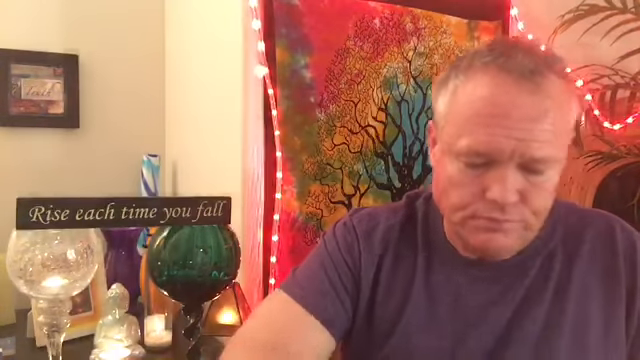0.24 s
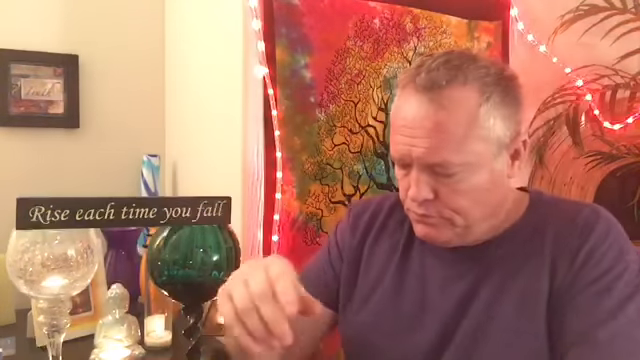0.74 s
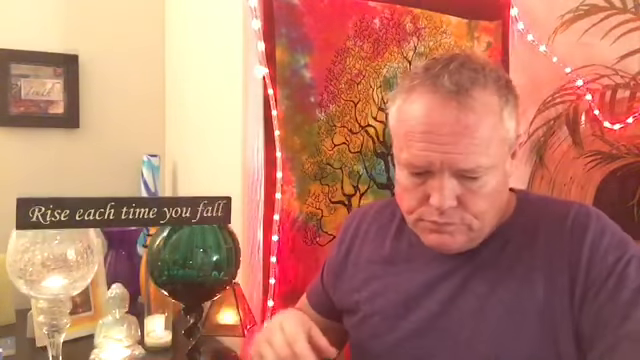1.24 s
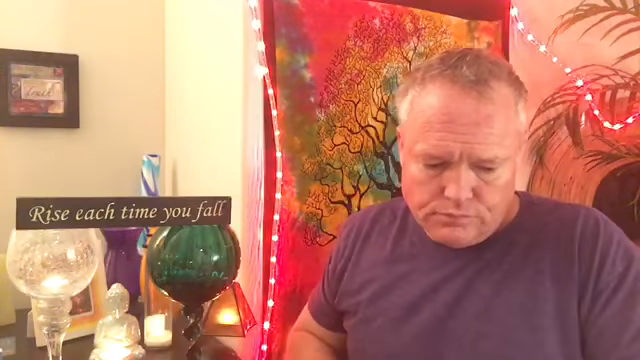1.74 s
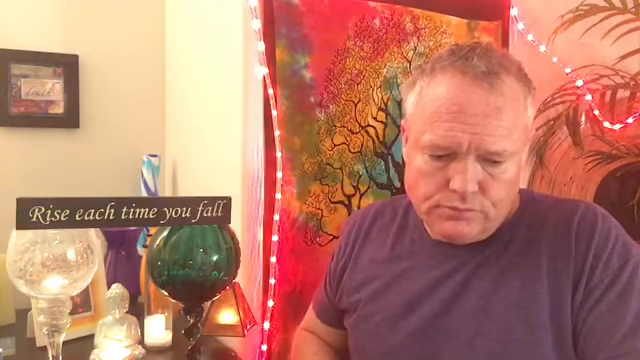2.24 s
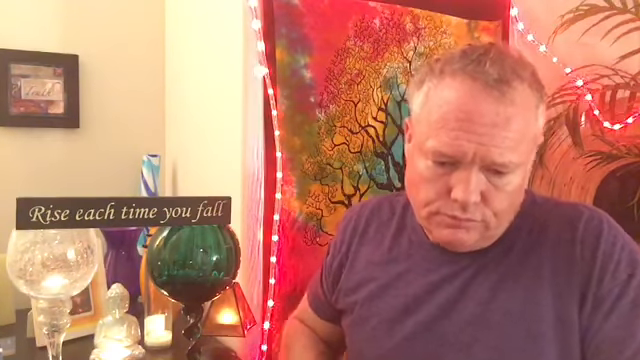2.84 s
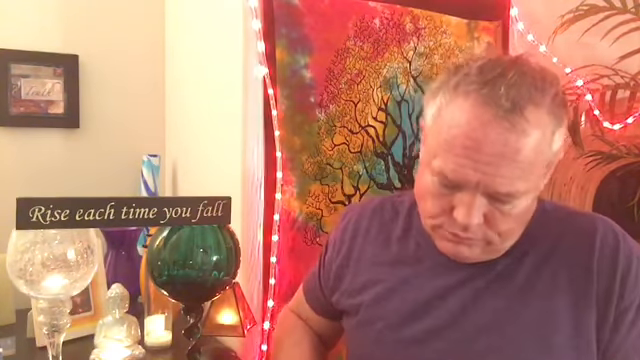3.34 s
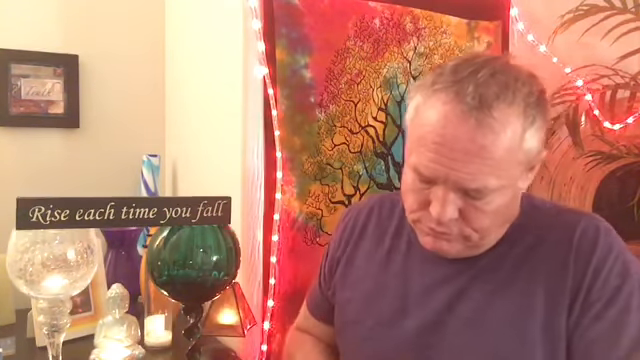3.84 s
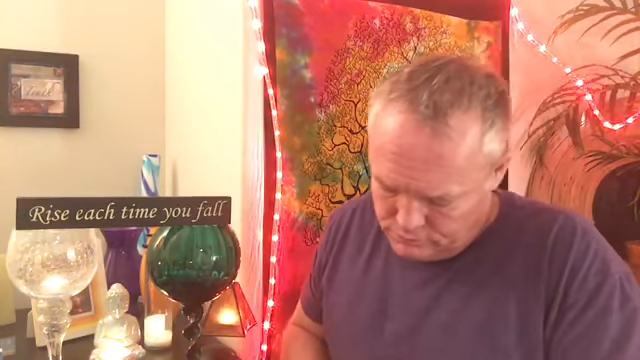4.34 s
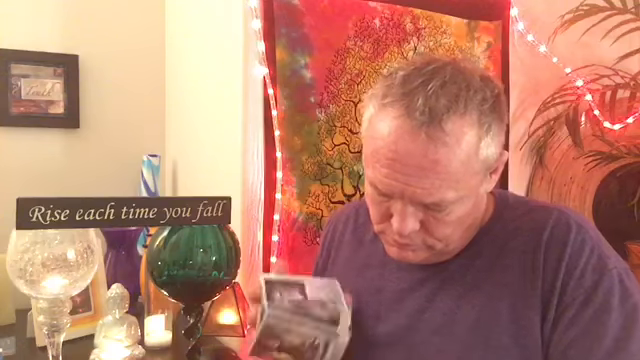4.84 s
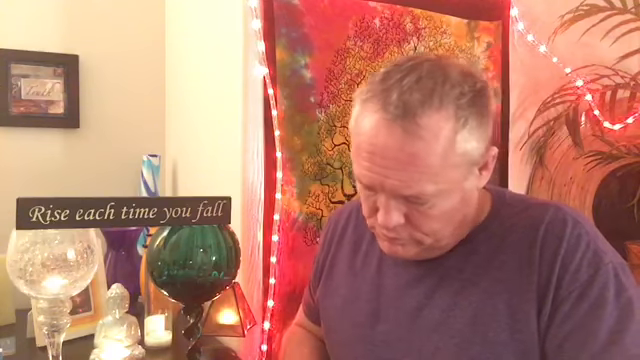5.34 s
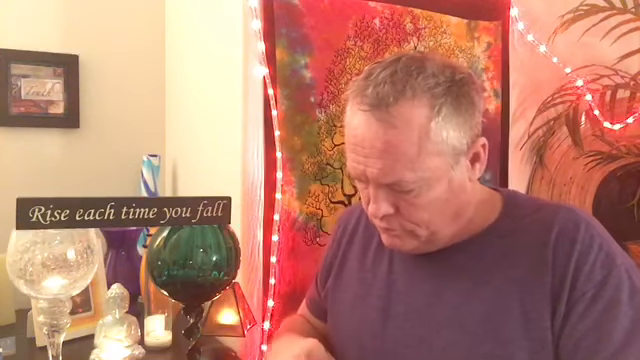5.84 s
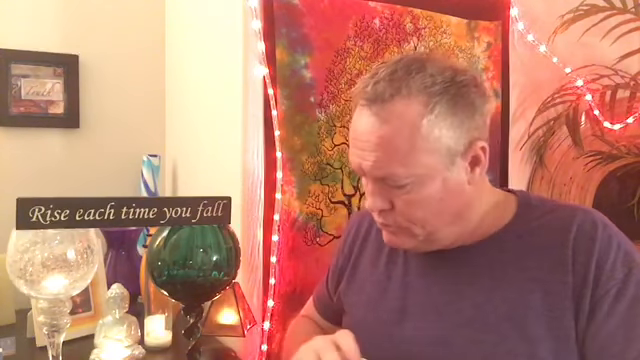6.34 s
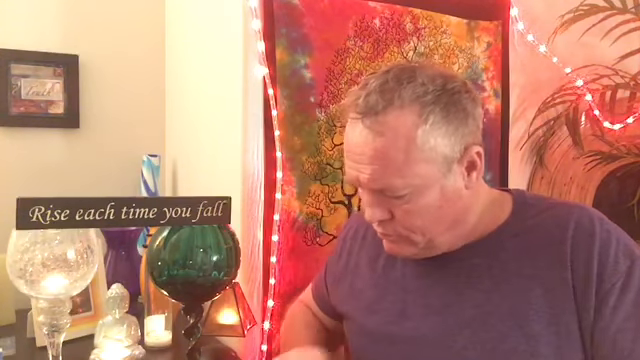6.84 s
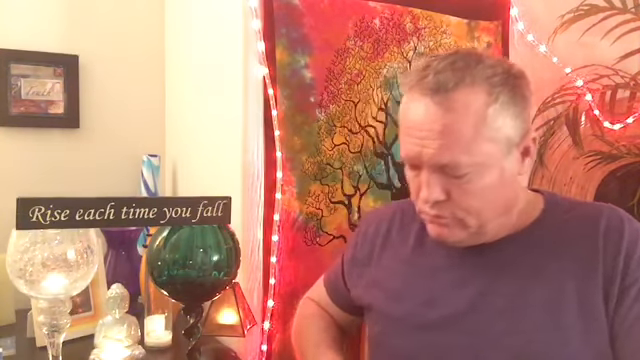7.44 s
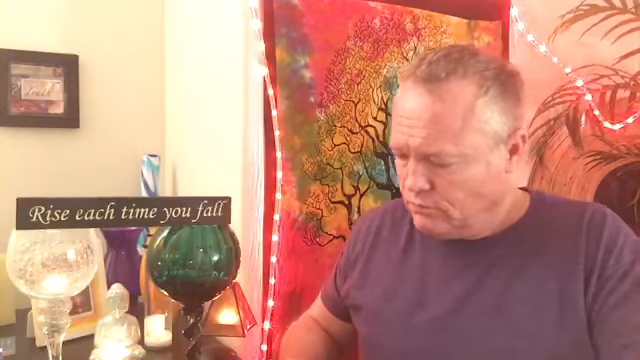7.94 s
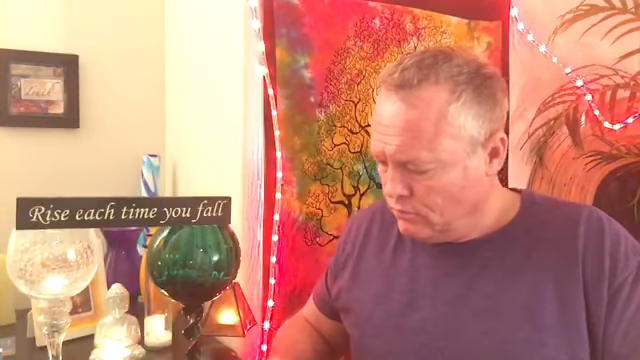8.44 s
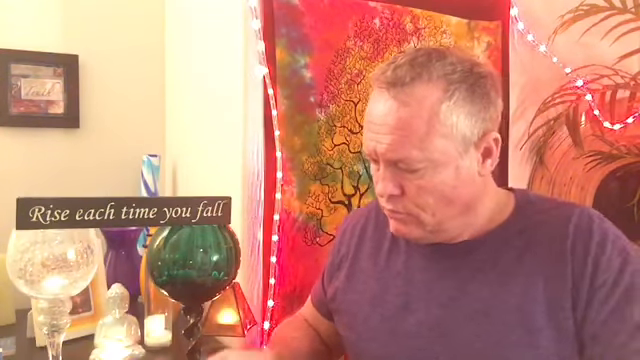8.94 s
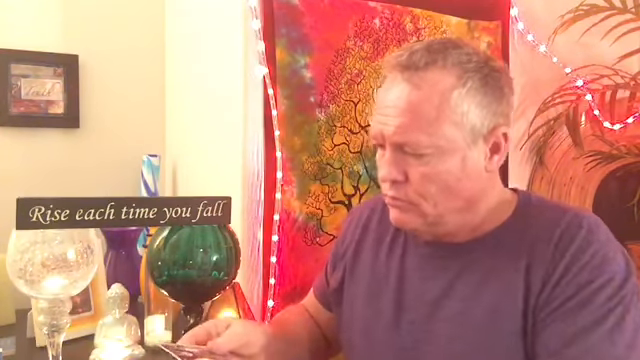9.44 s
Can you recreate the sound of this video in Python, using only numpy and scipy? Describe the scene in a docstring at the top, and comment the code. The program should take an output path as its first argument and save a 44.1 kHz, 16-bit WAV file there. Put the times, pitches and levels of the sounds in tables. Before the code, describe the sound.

Cards are handled close by on a table in a small, quiet room. Soft sliding and a few dull hand bumps open, with a light tap of the deck at about 1.6 seconds and small snaps around 2. At 3 seconds the deck hits the table with the loudest sound, a sharp snap and thud, followed by a second knock at 3.4 and soft rustling. At 5 seconds a quick run of cards flicks off the thumb and ends in a slap. Gentle sliding continues until just after 6, then there is a lull. Another knock comes at about 7.5 seconds, with light snaps and bumps until 8.3 and a faint slide near 9. Underneath are steady room noise with a low hum, a thin whine, faint regular ticks and occasional tiny pips.

```python
"""Tarot cards on a cloth-covered table

In a small, quiet room a deck is knocked on the table, a run of cards flicks off the thumb, and cards
are slid and laid down. Impact snaps their edges, expels trapped air in a clap and excites the modes
of the table; friction gives a hiss. A few faint pips are heard. Under it lie a steady room noise,
a thin whine and faint regular ticks."""
import sys
import numpy as np
from scipy import signal
from scipy.fft import rfft, irfft
from scipy.io import wavfile
from scipy.ndimage import uniform_filter1d, minimum_filter1d

SR = 44100
rng = np.random.default_rng(int(sys.argv[2]) if len(sys.argv) > 2 else 0)


def output_pcm(signal):
    """Save a mono or channel-first signal as 16-bit PCM at the path in sys.argv[1].

    Samples are clipped to [-1, 1] before scaling.
    """
    pcm = np.clip(np.atleast_2d(signal).T, -1, 1) * 32767
    wavfile.write(sys.argv[1], SR, np.round(pcm).astype(np.int16))


N = 427302

# The deck or a packet lands: (time [s], snap [dB], air clap [dB], edge [dB], decay time [s],
# face slap [dB], thud [dB], thud frequency [Hz], ring relative to thud [dB], rebound [dB])
DECK_KNOCKS = [(1.648, -34.5, -32.5, -75, 0.0079, -35, -21.5, 266, -12, -25),
               (2.9699, -7, -24.5, -42, .016, -13, -7, 210, -3, -10),
               (3.4015, -12, -19, -57, 0.0061, -19.5, -14, 310, -0.5, -14.5),
               (3.694, -37, -44, -72, 0.004, -42, -23, 395, -5, -35),
               (5.0875, -15, -15, -43, .002, -21, -13.5, 222, 0.5, -18.5),
               (7.5527, -18, -18, -45, 0.0054, -24.5, -17, 350, -14, -31)]
# Single cards snap: (time [s], snap [dB], air clap [dB], edge [dB], decay time [s])
CARD_SNAPS = [(0.419, -34, -52, -75, 0.0011), (1.980, -39, -44, -72, 0.0039),
              (2.082, -36, -60, -70, 0.0038), (2.3615, -40, -32, -75, 0.0028),
              (3.385, -46, -33, -69, 0.0068), (5.0053, -14, -17.5, -41, 0.0029),
              (5.027, -17.5, -16, -45, 0.0054), (5.0448, -19.5, -13.5, -43, 0.0048),
              (5.0812, -36, -42, -41, .001), (5.1244, -19.5, -23, -53, 0.0047),
              (5.622, -36.5, -54, -78, 0.003), (7.481, -41, -35.5, -70, 0.0023),
              (7.534, -33.5, -43, -47, .014), (7.8925, -25, -39, -80, 0.0033),
              (7.919, -31, -38, -69, 0.0033), (8.128, -40.5, -45, -60, 0.0067),
              (8.243, -38.5, -43, -57, 0.01)]
# Spectra of the three parts of a card impact: (frequency [Hz], relative level [dB])
SNAP_SPECTRUM = [(40, -56), (300, 2.5), (1000, -15.5), (1600, -7), (2100, 0), (2600, 2.5), (3150, 2),
                 (3550, -4), (4100, -10.5), (5000, -21.5), (6000, -24), (7000, -38), (9000, -60),
                 (11000, -79)]
CLAP_SPECTRUM = [(35, -53), (120, -20), (350, -15.5), (500, -10), (650, -1), (780, 1), (950, -4),
                 (1150, -0.5), (1450, -8), (1900, -11.5), (3000, -4.5), (6000, -70)]
EDGE_SPECTRUM = [(100, -51), (1500, -7), (4000, 3), (6200, 5.5), (7300, -3.5), (8800, 4), (10400, -17),
                 (11500, -8), (15500, -23)]
# A hand bumps the table: (time [s], level [dB], push frequency [Hz])
HAND_BUMPS = [(0.993, -30.5, 190), (1.026, -28, 242), (1.1, -23, 265), (1.257, -40, 170), (1.399, -38, 166),
              (2.706, -38, 169), (2.810, -39, 160), (3.173, -30, 212), (3.386, -20, 259), (4.972, -29, 270),
              (5.012, -22.5, 258), (5.221, -23, 224), (7.379, -33, 174), (7.494, -27.5, 213),
              (7.901, -27.5, 227), (8.088, -27.5, 228), (8.151, -25, 178)]
# Normal modes of the table: (frequency [Hz], relative level [dB], T60 [s])
TABLE_MODES = [(97, -6.5, 0.21), (150.7, 13, 0.36), (209, 8, 0.18), (296, -24, 0.14), (365, -19, .22),
               (485, 4, 0.21), (498, 7, 0.2), (583, 12, 0.26), (760, -16.5, .15), (904, 7, .18)]
# Cards slide over cards and cloth: (start [s], duration [s], relative level [dB])
SLIDE_STROKES = [(0.077, 0.36, -58), (1.004, .54, -53), (1.544, 0.089, -44.5), (1.814, .38, -50.5),
                 (2.235, 0.15, -49.5), (3.108, 0.87, -50.5), (4.923, 0.56, -50.5), (5.55, 0.71, -53),
                 (7.265, .26, -53), (7.52, .03, -43), (7.62, 0.15, -51.5), (7.903, 0.24, -53),
                 (9.06, 0.21, -58)]
# Spectrum of that friction: (frequency [Hz], relative level [dB])
FRICTION_SPECTRUM = [(100, -12), (250, 8.5), (600, -1.5), (1100, -3.5), (1700, -5), (2300, 1.5), (3100, -5),
                     (3800, -21), (4800, -27), (8000, -34), (15000, -46)]
# Faint, brief pips: (midpoint [s], relative level [dB], frequency [Hz], duration [s])
FAINT_PIPS = [(0.197, -38, 2170, 0.011), (0.262, -40.5, 631, 0.049), (0.642, -46, 1660, 0.041),
              (1.035, -47, 833, 0.051), (1.847, -44, 2150, 0.028), (5.666, -42, 734, 0.021),
              (6.118, -43.5, 1430, 0.033), (7.327, -41.5, 633, 0.038), (7.825, -44, 986, 0.027),
              (9.4, -44.5, 1480, 0.03), (9.491, -35.5, 636, 0.02)]
# Reverberation time of the room: (frequency [Hz], T60 [s])
ROOM_T60 = [(100, 0.14), (300, 0.38), (800, 0.36), (2500, 0.34), (5000, 0.21), (12000, 0.23)]
# Reflections of the cards as the hands move nearer and farther: (time [s], gain [dB])
REFLECTION_GAIN = [(1.6, -3), (2.97, -3.5), (3.4, -3.5), (5.0, -6.5), (5.12, -3), (7.55, -5.5), (7.9, -4),
                   (9.69, -1)]
# Two trains of ticks: (first tick [s], tip level [dB], body level [dB])
TICK_TRAINS = [(.1565, -41, -28), (.108, -43, -25.5)]
# Ticks that stand out, one row per train: (beat [index from 0], ...)
ACCENTED_BEATS = [(1, 7, 16, 20, 21, 23, 27, 29, 31), (0, 3, 23, 28, 29, 35, 41, 44)]
# Spectra of a tick's fine tip and ringing body: (frequency [Hz], relative level [dB])
TICK_TIP_SPECTRUM = [(100, -42), (3000, -31), (4500, 11), (5300, -0.5), (6500, 7), (9000, 2), (10500, -12),
                     (15000, -22)]
TICK_BODY_SPECTRUM = [(100, -50), (700, -34), (1400, 2), (2000, 5), (2450, 8.5), (3000, 11), (3700, -22),
                      (4400, -11.5), (6000, -57)]
# Spectrum of the room noise: (frequency [Hz], relative level [dB])
AMBIENT_SPECTRUM = [(20, -11), (50, 2.5), (170, -0.5), (310, 2), (430, -8), (620, -6), (1100, -18.5),
                    (1900, -18.5), (2750, -10.5), (4200, -30), (6700, -30), (10400, -40.5), (11500, -40.5),
                    (16000, -43)]
# Narrow bands of hum: (centre frequency [Hz], bandwidth [Hz], level [dB])
HUM_BANDS = [(100, 9.9, -56.5), (231.35, 9.6, -52.5), (319.3, 43, -55.5)]

POCKET_HZ = 1333  # resonance of the air held between a card and the hand


def card_impacts(first_touch=3.7, graininess=0.24):
    """Impact excitation: one sharp touch, then a decaying spray of tiny ones as stacked cards meet."""
    t = np.arange(SR // 8) / SR
    cards, edges = np.zeros((2, N))
    singles = [(s, snap, air, POCKET_HZ, edge, decay) for s, snap, air, edge, decay in CARD_SNAPS]
    for s, snap_db, air_db, pocket_hz, edge_db, decay_s in thumb_run() + deck_contacts() + singles:
        spray, sizes = rng.standard_normal((2, len(t)))
        fade = np.exp(-t / decay_s)
        touch = unit_rms(spray * np.exp(graininess * sizes)) * fade
        touch[0] = first_touch
        strength = np.sqrt(np.mean(fade ** 2))  # a longer contact carries more energy
        snap = unit_rms(colour(touch, SNAP_SPECTRUM))
        puff = gain_of(-1) * unit_rms(colour(touch, CLAP_SPECTRUM))
        clap = unit_rms(puff + air_pocket(touch, pocket_hz))
        add(cards, s, strength * (gain_of(snap_db) * snap + gain_of(air_db) * clap))
        add(edges, s, strength * gain_of(edge_db) * unit_rms(colour(touch, EDGE_SPECTRUM)))
    return cards, edges


def deck_contacts(corner_lead_s=0.0055, corner_db=-16, corner_decay_s=0.0077,
                  face_lag_s=0.009, face_db=-14, face_hz=490, face_decay_s=0.006):
    """Successive collisions: a landing deck touches with a corner, then its edge, then its flat face."""
    rows = []
    for s, snap, air, edge, decay_s, slap, *_ in DECK_KNOCKS:
        rows.append((s - corner_lead_s, snap + corner_db, air + corner_db, POCKET_HZ,
                     edge + corner_db, corner_decay_s))
        rows.append((s, snap, air, POCKET_HZ, edge, decay_s))
        rows.append((s + face_lag_s, snap + face_db, slap, face_hz, edge + face_db, face_decay_s))
    return rows


def thumb_run(count=7, start_s=5.015, gap_s=0.0205, jitter_s=0.00152, snap_db=-27.5, edge_db=-54,
              air_db=-19.5, air_db_per_s=-105, pocket_hz=1120, decay_s=0.016):
    """Quasi-periodic impacts: cards flick off the thumb, the clap fading as the packet thins."""
    lags = gap_s * np.arange(count) + jitter_s * rng.standard_normal(count)
    return [(start_s + lag, snap_db, air_db + air_db_per_s * lag, pocket_hz, edge_db, decay_s)
            for lag in lags]


def air_pocket(touch, hz, width_hz=420):
    """Cavity resonance: trapped air favours one band; two resonators in series give it steep skirts."""
    radius = np.exp(-np.pi * width_hz / SR)
    resonator = [1, 0, -1, 1, -2 * radius * np.cos(2 * np.pi * hz / SR), radius ** 2]
    return unit_rms(signal.sosfilt([resonator, resonator], touch))


def table_thuds(bass_cutoff_hz=105):
    """Forced and free vibration: a padded blow drives the table a cycle or two and its modes ring on."""
    t, out = np.arange(SR // 2) / SR, np.zeros(N)
    modes = sum(gain_of(db - 60 * t / t60) * np.sin(2 * np.pi * hz * t) for hz, db, t60 in TABLE_MODES)
    for s, db, hz, ring_db in table_blows():
        cycles = hz * t
        push = 2 * cycles * np.exp(1 - 2 * cycles) * np.sin(2 * np.pi * cycles)
        force = t * np.exp(-2 * np.pi * cycles)  # a softer blow reaches only the low modes
        ring = signal.fftconvolve(force, modes)[:len(t)]
        add(out, s, gain_of(db) * (push + gain_of(ring_db) * ring / abs(ring).max()))
    # the deepest bass is taken away
    return signal.sosfilt(signal.butter(3, bass_cutoff_hz, "high", fs=SR, output="sos"), out)


def table_blows(bump_hz=195.5, ring_db_per_octave=-25, thud_lag_s=0.00541,
                rebound_lag_s=0.029, rebound_hz=190, rebound_ring_db=-5):
    """Momentum transfer: the table gives under the hands, the landing deck and its rebound."""
    # a slower, softer push rings the table more
    rows = [(s, db, hz, 1 + ring_db_per_octave * np.log2(hz / bump_hz)) for s, db, hz in HAND_BUMPS]
    for s, *_, thud_db, hz, ring_db, rebound_db in DECK_KNOCKS:
        rows.append((s + thud_lag_s, thud_db, hz, ring_db))
        rows.append((s + rebound_lag_s, rebound_db, rebound_hz, rebound_ring_db))
    return rows


def card_slides(catches_per_s=70, catch_db=-10, uneven_db=3):
    """Sliding friction: an uneven hiss with small catches of the edges, brighter at higher speed."""
    level_db = rubbing_level_db()
    catches = rng.standard_normal(N) * (rng.random(N) < catches_per_s / SR)
    friction = rng.standard_normal(N) + gain_of(catch_db) * unit_rms(catches)
    swish_db = level_db.max() - 3 + 2 * (level_db - level_db.max())  # grows as amplitude squared
    swish = gain_of(swish_db) * band_noise(hz=3000, width_hz=1100)
    rub_db = level_db - 2 + uneven_db * band_noise(hz=0, width_hz=54)
    return colour(friction * gain_of(rub_db), FRICTION_SPECTRUM) + swish


def rubbing_level_db(rise_s=0.019, fall_s=0.085, hold_db=-55.5):
    """Incoherent addition: the powers of the strokes add to the faint rub of the deck in the fingers."""
    t, power = np.arange(N) / SR, gain_of(hold_db) ** 2
    for s, duration, db in SLIDE_STROKES:
        speed = np.clip((t - s) / rise_s, 0, 1) * np.clip(1 - (t - s - duration) / fall_s, 0, 1)
        power = power + (gain_of(db) * speed) ** 2
    return 10 * np.log10(power)


def faint_pips(glide=0.08, blur_hz=130, trim_db=-2):
    """Frequency modulation: faint, brief, slightly rising pips with a blurred pitch."""
    out, unevenness = np.zeros(N), band_noise(hz=0, width_hz=270)
    for s, db, hz, duration in FAINT_PIPS:
        position = np.linspace(-0.5, 0.5, int(duration * SR))
        pitch = hz * (1 + glide * position) + blur_hz * unevenness[round(s * SR):][:len(position)]
        tone = np.sin(2 * np.pi * np.cumsum(pitch) / SR)
        add(out, s - duration / 2, gain_of(db + trim_db) * tone * np.cos(np.pi * position))
    return out


def wall_reflections(x, echoes_per_s=8000, build_s=0.0074):
    """Reverberation: dense reflections build up quickly, and each band decays at its own rate."""
    echoes = rng.choice([-1., 1.], SR // 2) * (rng.random(SR // 2) < echoes_per_s / SR)
    hz, t, bands = signal.stft(echoes, SR, nperseg=256)
    decay = gain_of(-60 * t / value_at(ROOM_T60, hz)[:, None])
    tail = signal.istft(bands * decay, SR, nperseg=256)[1]
    tail *= np.clip(np.arange(len(tail)) / SR / build_s, 0, 1)
    midband = abs(rfft(tail, SR))[500:4000]  # brought to unit gain from 500 to 4000 Hz
    return signal.fftconvolve(x, tail / np.sqrt(np.mean(midband ** 2)))[:N]


def ticks(periods_s=(0.3, 0.2048), accent_db=5.5, spread_db=1.5):
    """Periodic impulses, probably electrical: dry, uneven clicks with a fine tip and a ringing body."""
    tips, bodies = np.zeros((2, N))
    for (first, tip_db, body_db), period, accents in zip(TICK_TRAINS, periods_s, ACCENTED_BEATS):
        for beat, s in enumerate(np.arange(first, N / SR, period)):
            size_db = accent_db if beat in accents else spread_db * rng.standard_normal()
            add(tips, s, gain_of([tip_db + size_db]))
            add(bodies, s, gain_of([body_db + size_db]))
    return colour(tips, TICK_TIP_SPECTRUM) + colour(bodies, TICK_BODY_SPECTRUM)


def room_noise(air_db=-46.5, waver_db=0.5, whine_hz=3447, whine_db=-64.5, drift_hz=3):
    """Noise floor: wavering broadband noise, narrow bands of hum and an electrical whine superpose."""
    air = colour(rng.standard_normal(N), AMBIENT_SPECTRUM)
    air *= gain_of(air_db + waver_db * band_noise(hz=0, width_hz=32))
    hum = sum(gain_of(db) * band_noise(hz, width) for hz, width, db in HUM_BANDS)
    pitch = whine_hz + drift_hz * band_noise(hz=0, width_hz=9.4)
    whine = np.sin(2 * np.pi * np.cumsum(pitch) / SR)
    return air + hum + gain_of(whine_db) * unit_rms(whine)


def gain_of(db):
    """Decibel law: 20 dB is a factor of ten in amplitude."""
    return 10 ** (np.asarray(db) / 20)


def unit_rms(x):
    """Normalisation to an rms of 1."""
    return x / np.sqrt(np.mean(x ** 2) + 1e-20)


def value_at(points, hz):
    """Linear interpolation of a table on a log-frequency axis."""
    f, value = np.transpose(points)
    return np.interp(np.log(hz + 1), np.log(f + 1), value)


def add(mix, s, sound):
    """Superposition: a sound joins the mix at s seconds."""
    part = mix[max(round(s * SR), 0):][:len(sound)]
    part += sound[:len(part)]


def colour(x, spectrum, size=4096):
    """Minimum-phase filtering: a causal response of unit energy with the given spectral shape."""
    log_gain = np.log(gain_of(value_at(spectrum, abs(np.fft.fftfreq(size, 1 / SR)))))
    response = np.exp(np.conj(signal.hilbert(log_gain)))
    taps = np.fft.ifft(response).real[:size // 2]
    return signal.oaconvolve(x, taps / np.linalg.norm(taps))[:len(x)]


def band_noise(hz, width_hz):
    """Spectral shaping: noise of rms 1 in a Gaussian band; around 0 Hz it is a random wander."""
    bell = np.exp(-2 * ((np.fft.rfftfreq(N, 1 / SR) - hz) / width_hz) ** 2)
    return unit_rms(irfft(rfft(rng.standard_normal(N)) * bell, N))


def scene(edge_reflection_db=-4, table_reflection_db=-8):
    """Direct and reverberant fields: cards and table sound with their reflections, the rest dry."""
    cards, edges = card_impacts()
    cards += card_slides()
    table = table_thuds()
    card_reflection_db = np.interp(np.arange(N) / SR, *np.transpose(REFLECTION_GAIN))
    walls = wall_reflections(gain_of(card_reflection_db) * cards + gain_of(edge_reflection_db) * edges
                             + gain_of(table_reflection_db) * table)
    return (cards + edges + table + walls + faint_pips() + ticks() + room_noise())[None]


def record(dry, ceiling=0.88, cutoff_hz=15800):
    """Peak and band limiting: a smooth gain holds knocks under full scale, then a low-pass follows."""
    allowed = np.minimum(1, ceiling / (abs(dry) + 1e-9))
    held = minimum_filter1d(allowed, size=161)
    gain = uniform_filter1d(uniform_filter1d(held, size=81), size=81)
    lowpass = signal.firwin(511, cutoff_hz, window=("kaiser", 9), fs=SR)
    return signal.oaconvolve(dry * gain, lowpass[None], "same")


dry = scene()
out = record(dry)
output_pcm(out)
```